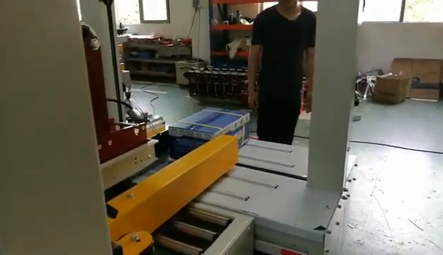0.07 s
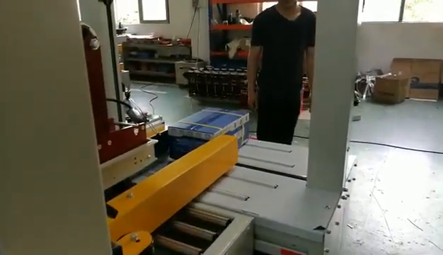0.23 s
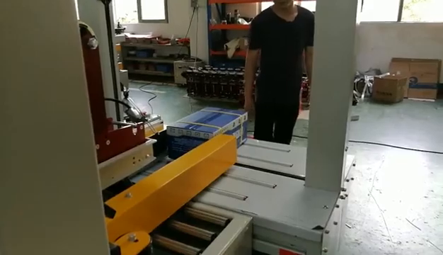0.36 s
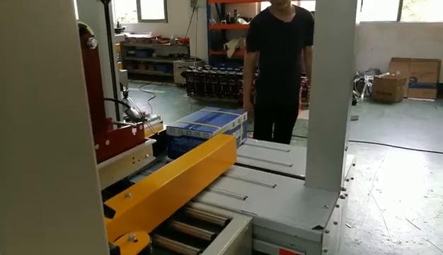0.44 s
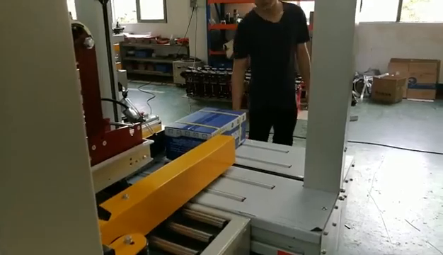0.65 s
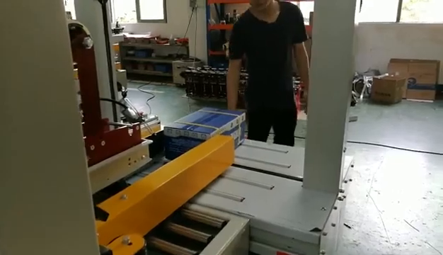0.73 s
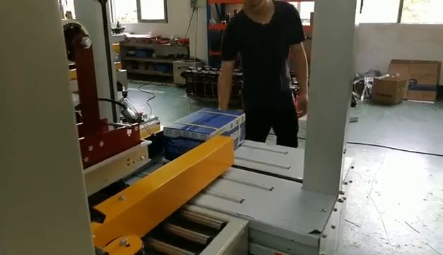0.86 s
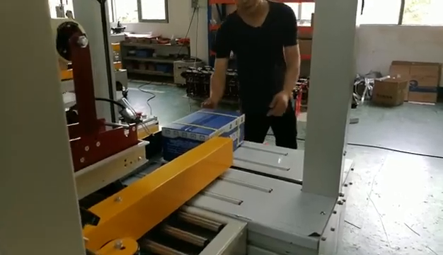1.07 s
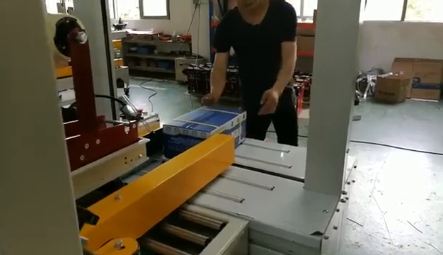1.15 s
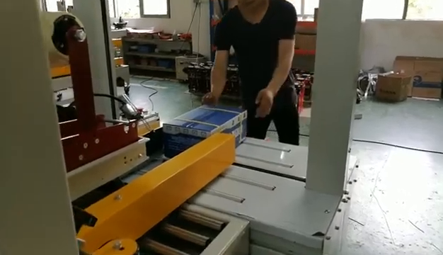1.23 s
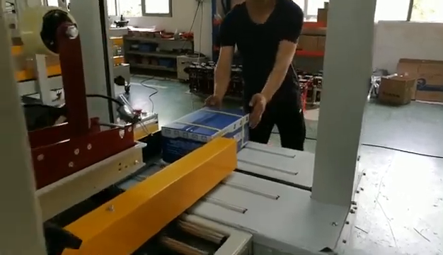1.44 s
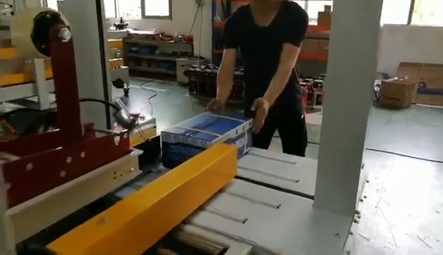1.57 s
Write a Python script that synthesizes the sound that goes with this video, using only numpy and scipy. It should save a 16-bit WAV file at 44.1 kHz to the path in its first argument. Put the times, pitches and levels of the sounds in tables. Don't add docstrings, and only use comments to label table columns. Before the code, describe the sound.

Packaging machine cycling: low bumps, loud metallic clack, hissing air, tape whir, snap, final thudding clatter

```python
import sys
import numpy as np
from scipy import signal
from scipy.fft import rfft, irfft
from scipy.io import wavfile
from scipy.ndimage import uniform_filter1d

SR = 44100
rng = np.random.default_rng(int(sys.argv[2]) if len(sys.argv) > 2 else 0)


def convert_level_to_amplitude(level_db):
    exponent = np.asarray(level_db, float) / 20
    return 10 ** exponent


def store_pcm(level_fs):
    pcm = np.round(np.clip(level_fs, -1, 1) * 32767).astype(np.int16)
    wavfile.write(sys.argv[1], SR, np.atleast_2d(pcm).T)


N = 70560

# (frequency [Hz], side minus mid [dB])
STEREO_SPREAD = [(60, -18.5), (150, -18.5), (230, -25.5), (360, -3.5), (570, -0.5), (890, -3), (1400, -4.5),
                 (2200, -1), (8460, -0.5)]
# (frequency [Hz], density [dB per Hz])
ARM_NOISE = [(88, -46), (150, -20), (325, -11), (514, -4), (1020, -10), (2400, -12), (4210, -16),
             (5000, -19.5), (7600, -23)]


def evened(x):
    return x / np.sqrt(np.mean(x ** 2) + 1e-20)


def read(points, hz):
    f, value = np.transpose(points)
    return np.interp(np.log(hz + 1), np.log(f + 1), value)


def curve(rows, axis=1):
    rows = np.array(rows)
    return np.interp(np.arange(N) / SR, rows[:, 0], rows[:, axis])


def resonate(x, hz, width):
    turn = np.exp(2j * np.pi * np.cumsum(hz * np.ones(N)) / SR)
    r = np.exp(-np.pi * width / SR)
    return 2 * (turn * signal.lfilter([1 - r], [1, -r], x / turn)).real


def pair(a, b, hz):
    side = convert_level_to_amplitude(read(STEREO_SPREAD, hz))[:, None]
    return np.array([a + side * b, a - side * b]) / np.sqrt(1 + side ** 2)


def hiss(spectrum, patchy_db=0.):
    frames, hz = N // 128 + 6, np.fft.rfftfreq(512, 1 / SR)
    a, b, c, d, patches = rng.standard_normal((frames, 257, 5)).T
    patches = uniform_filter1d(patches, size=5, axis=0)
    patches = evened(uniform_filter1d(patches, size=14, axis=1))
    gain = convert_level_to_amplitude(read(spectrum, hz)[:, None] + patchy_db * patches) * (hz[:, None] < 9500)
    z = pair(a + 1j * b, c + 1j * d, hz) * gain
    return evened(signal.istft(z, nperseg=512, noverlap=384)[1][:, :N])


def hall(x):
    # (frequency [Hz], t60 [s])
    hall_t60 = [(150, 2.25), (600, 2.33), (2000, 1.35), (4000, 1.58), (8000, 0.74)]
    taps = np.zeros((2, SR))
    at = np.arange(300, SR - 20, 20)
    at = at + rng.integers(0, 20, (2, len(at)))
    np.put_along_axis(taps, at, rng.choice([-1., 1.], at.shape), 1)
    hz, t, z = signal.stft(taps, SR, nperseg=512)
    decay = convert_level_to_amplitude(-60 * t / read(hall_t60, hz)[:, None])
    tail = signal.istft(pair(*z, hz) * decay, SR, nperseg=512)[1]
    return signal.fftconvolve(x.mean(axis=0)[None], tail / np.linalg.norm(tail[0]), axes=1)[:, :N]


def knocks(rows, rise_cycles, wet_db):
    t, out = np.arange(N) / SR, np.zeros((2, N))
    for s, db, hz, t60 in rows:
        u = np.maximum(t - s, 0)
        rise = np.sin(np.pi / 2 * np.minimum(u * hz / rise_cycles, 1))
        swell = convert_level_to_amplitude(db - 60 * u / t60) * rise
        mid = np.sin(2 * np.pi * hz * u)
        side = convert_level_to_amplitude(read(STEREO_SPREAD, hz) - 5) * np.cos(2 * np.pi * hz * u)
        out += swell * np.array([mid + side, mid - side])
    return out + convert_level_to_amplitude(wet_db) * hall(out)


def struck(blows, modes, crack, crack_db, crack_t60, wet_db, pan_db):
    t = np.arange(N) / SR
    force, after = np.zeros(N), np.zeros(N)
    for s, db, rise in blows:
        u = np.maximum(t - s, 0)
        force[round(s * SR)] = convert_level_to_amplitude(db)
        after += convert_level_to_amplitude(db + crack_db - 60 * u / crack_t60) * np.minimum(u / max(rise, 1e-4), 1)
    u, body = t[:SR // 2], 0
    for k, ((hz, db, t60), phase) in enumerate(zip(modes, rng.random(len(modes)))):
        phases = np.array([[k // 2 / 2], [phase]])
        levels = convert_level_to_amplitude([[0], [read(STEREO_SPREAD, hz) - 4]])
        mid, side = np.sin(2 * np.pi * (hz * u + phases)) * levels
        body = body + convert_level_to_amplitude(db - 60 * u / t60) * np.array([mid + side, mid - side])
    dry = signal.fftconvolve(force[None], body, axes=1)[:, :N] + after * hiss(crack)
    return dry * convert_level_to_amplitude([[pan_db / 2], [-pan_db / 2]]) + convert_level_to_amplitude(wet_db) * hall(dry)


def hum():
    # (frequency [Hz], density [dB per Hz])
    hall_colour = [(25, -29.5), (70, -14), (170, -6.5), (380, -6.5), (480, -6), (900, -16.5), (3200, -17),
                   (7600, -33)]
    level_db = -44.5
    hz = np.fft.rfftfreq(N, 1 / SR)
    white = rfft(hiss([(20, 0.003), (9000, 0.028)], patchy_db=-1.5))
    return convert_level_to_amplitude(level_db) * evened(irfft(white * convert_level_to_amplitude(read(hall_colour, hz)), N))


def drive():
    # (time [s], level [dB])
    load = [(0, -45), (.1, -48.5), (.22, -39.5), (.28, -41), (.33, -40.5), (.38, -44), (.52, -38),
            (.66, -46), (.85, -48), (1.25, -51.5), (1.6, -59)]
    # (frequency [Hz], width [Hz], level [dB])
    frame_modes = [(163.2, 35.5, 5), (206, 32, 7), (242.8, 18, -1), (326.6, 112, -3), (365.3, 22, 3),
                   (108, 13, -18), (760, 920, -6)]
    push = hiss([(50, 0.5), (2000, 0.0), (4000, -19.0)], patchy_db=1.0)
    body = 0
    for f, width, db in frame_modes:
        body = body + convert_level_to_amplitude(db) * np.array([resonate(resonate(p, f, width), f, width) for p in push])
    return convert_level_to_amplitude(curve(load)) * evened(body)


def motor():
    # (time [s], level [dB], pitch [Hz])
    speed = [(0, -73, 104.1), (.55, -62, 104.9), (.72, -58.5, 105), (1.0, -54.5, 102.8), (1.1, -57, 97.4),
             (1.25, -58, 105.4), (1.38, -60, 106), (1.6, -78, 107.4)]
    hz, width = curve(speed, axis=2), 18.0
    waver = evened(resonate(resonate(rng.standard_normal(N), hz, width), hz, width))
    tone = np.sin(2 * np.pi * np.cumsum(hz) / SR)
    return convert_level_to_amplitude(curve(speed)) * evened(tone + 1.7 * waver)


def clutch():
    # (time [s], level [dB], pitch [Hz], t60 [s])
    bumps = [(.097, -49, 241, 0.093), (.131, -34.5, 250, 0.13), (.19, -42, 177, 0.17),
             (.236, -34.5, 230, 0.14), (.25, -42.5, 364, 0.19), (.33, -38, 392.6, .15),
             (.36, -33, 185, 0.17), (.419, -32.5, 197, .25), (.425, -32.5, 349, 0.13),
             (.455, -31.5, 177.4, 0.31), (.497, -32, 165, 0.23), (.525, -33, 174, 0.18),
             (.55, -39, 357.6, 0.24), (.575, -42.5, 152, 0.18)]
    return knocks(bumps, rise_cycles=2.2, wet_db=-7.5)


def air():
    # (time [s], level [dB])
    flow = [(.215, -65), (.24, -37), (.3, -41), (.39, -43), (.5, -38), (.7, -44.5), (.95, -42.5),
            (1.08, -42.5), (1.12, -46), (1.25, -51), (1.6, -55.5)]
    # (frequency [Hz], density [dB per Hz])
    jet_colour = [(290, -34), (500, -21), (600, -10.5), (762, 2), (1260, -19), (2460, -1), (3390, 0),
                  (7600, -9.5), (9880, -34.5), (16700, -120)]
    return convert_level_to_amplitude(curve(flow)) * hiss([(200, -40)] + list(jet_colour), patchy_db=.7)


def valve():
    # (time [s], level [dB], rise [s])
    ticks = [
        (.2207, -32, .0004),
        (.2221, -36, .0005),
        (.226, -43, .001),
        (.2315, -37, .0015),
    ]
    # (frequency [Hz], level [dB], t60 [s])
    housing_modes = [(1475, -3, .05), (2250, -3, .01), (2750, -3, .012), (3200, -3, .025), (3887, -6, .012),
                     (8100, -6, .012)]
    # (frequency [Hz], density [dB per Hz])
    tick_noise = [(300, -6), (700, -2), (1260, 3), (2700, 10), (4400, 3), (5600, -8), (7000, -5), (8100, 2),
                  (8900, -25)]
    return struck(ticks, housing_modes, tick_noise, crack_db=2.5, crack_t60=.016, wet_db=-7, pan_db=1.1)


def snaps():
    # (time [s], level [dB], pitch [Hz], t60 [s])
    parts = [(.2209, -21, 2500, .009), (.2214, -29, 4200, .008), (.2235, -29, 1150, .018),
             (.2225, -30, 8000, .008), (.2338, -30, 7600, .005), (.2325, -32, 3200, .012),
             (.4013, -13.5, 1650, .014), (.4018, -17, 3700, .018), (.4008, -27, 7800, .04),
             (.4067, -14.5, 4000, .014), (.4142, -18, 2900, .008), (.4208, -21, 2300, .01),
             (.4262, -22, 2200, .012), (.99, -29, 3600, .015), (1.0015, -32, 1000, .015),
             (1.3, -33, 1050, .05), (1.318, -32, 1080, .03), (1.343, -34, 1700, .03),
             (1.354, -36, 2400, .03)]
    return knocks(parts, rise_cycles=1.6, wet_db=-9)


def latch():
    # (time [s], level [dB], rise [s])
    clacks = [(.4009, -27, .0003), (.4019, -28, .0003), (.4045, -30, .001), (.407, -27, .0005),
              (.4105, -30, .001), (.4145, -29, .002), (.421, -30, .002), (.427, -30, .002),
              (.515, -40, .01)]
    # (frequency [Hz], level [dB], t60 [s])
    steel_modes = [(1510, -4, .015), (1650, -3, .035), (2225, -9, .2), (2649, -13, .06), (3140, -10, .05),
                   (3310, -8, .035), (3560, -7, .05), (3990, -9, .04), (4440, -9, .03), (4673, -13, .08),
                   (6045, -13, .07), (8100, -4, .015)]
    # (frequency [Hz], density [dB per Hz])
    clack_noise = [(300, -17), (600, -5), (1100, -7.5), (1600, -8.5), (2600, -3), (3700, -5), (4600, -7),
                   (6700, -10), (8600, -16)]
    return struck(clacks, steel_modes, clack_noise, crack_db=-3.0, crack_t60=0.059, wet_db=-1.5, pan_db=-2.7)


def tape():
    # (time [s], level [dB], pitch [Hz])
    peel = [(.49, -62, 3100), (.52, -41, 3100), (.56, -46, 2980), (.68, -45, 2950), (.85, -45, 2920),
            (.92, -43, 2900), (.98, -44, 2900), (1.04, -49, 2900), (1.095, -48, 2900)]
    slips_per_s, width_hz, spread_db, hiss_share = 800, 290, 1.9, .7
    draw = rng.random((N, 4)).T
    size = convert_level_to_amplitude(spread_db * np.minimum(-np.log(draw[1] + 1e-9), 4)) * np.sign(draw[2] - .5)
    slips = evened(size * (draw[0] < slips_per_s / SR))
    hz = curve(peel, axis=2)
    ring = []
    for noise in rng.standard_normal((2, N)):
        strip = resonate(slips + hiss_share * noise, hz, width_hz)
        ring.append(evened(resonate(strip, hz, 2 * width_hz)))
    n = np.arange(N)
    peeling = (n > peel[0][0] * SR) & (n < peel[-1][0] * SR)
    return peeling * convert_level_to_amplitude(curve(peel)) * np.array(ring) * convert_level_to_amplitude([[1.], [-1.]])


def cutter():
    # (time [s], level [dB], rise [s])
    cuts = [
        (.979, -44, .004),
        (.9835, -39, .003),
        (.99, -38, .002),
        (.998, -42, .003),
        (1.008, -42, .004),
        (1.019, -47, .004),
    ]
    # (frequency [Hz], level [dB], t60 [s])
    holder_modes = [(733, -2, 0.03), (870, -3, 0.023), (1460, -10, 0.03), (3100, -4, 0.019),
                    (3720, 0, 0.02), (6020, -3, 0.02), (4900, -5, .02)]
    # (frequency [Hz], density [dB per Hz])
    cut_noise = [(180, -35.5), (300, -21), (694, -3.5), (773, -2.5), (885, -7.5), (1010, -9.5), (7600, -11),
                 (9880, -57), (16700, -120)]
    return struck(cuts, holder_modes, cut_noise, crack_db=4.5, crack_t60=0.098, wet_db=-7.0, pan_db=1.5)


def scuff():
    # (time [s], level [dB], rise [s])
    scrapes = [
        (1.27, -49, .008),
        (1.284, -48, .008),
    ]
    # (frequency [Hz], level [dB], t60 [s])
    carton_modes = [(800, 4, .03), (1010, 7.9, 0.095)]
    return struck(scrapes, carton_modes, ARM_NOISE, crack_db=14.5, crack_t60=0.066, wet_db=-14, pan_db=-2.5)


def arm():
    # (time [s], level [dB], rise [s])
    landings = [
        (1.303, -32, .005),
        (1.309, -32, 0.006),
        (1.32, -36.5, 0.012),
        (1.335, -42, 0.0019),
        (1.356, -37.5, 0.0045),
        (1.364, -44.5, 0.0031),
        (1.379, -50, .004),
    ]
    # (frequency [Hz], level [dB], t60 [s])
    bar_modes = [(145.6, -6.5, 0.18), (202.7, -3, 0.25), (228, -8, 0.069), (299, -8.5, 0.062),
                 (398, -5, 0.11), (777, -10, 0.056), (1066, -10.5, 0.052), (1485, -9.5, 0.066),
                 (2360, -12, 0.027), (4180, -7, 0.031)]
    return struck(landings, bar_modes, ARM_NOISE, crack_db=-1.0, crack_t60=0.14, wet_db=-2.5, pan_db=0.9)


def thumps():
    # (time [s], level [dB], pitch [Hz], t60 [s])
    bounces = [(1.301, -28, 290, .06), (1.308, -27, 320, .06), (1.317, -28, 280, .05),
               (1.333, -35, 240, .06), (1.353, -31, 280, .05), (1.362, -31, 270, .05),
               (1.377, -34, 310, .05)]
    return knocks(bounces, rise_cycles=1.6, wet_db=-9)


def scene():
    steady = hum() + drive() + motor()
    opening = clutch() + air() + valve() + snaps() + latch()
    sealing = tape() + cutter() + scuff() + arm() + thumps()
    return steady + opening + sealing


def floor_dip(x):
    dip_hz, width_hz, share = 493, 150, 0.6
    return x - share * np.array([resonate(v, dip_hz, width_hz) for v in x])


def patchy_bands(x):
    # (frequency [Hz], share [0-1])
    side_kept = [(60, .12), (200, .15), (260, .35), (320, .75), (400, 1)]
    gap_share, deepest_db = .15, -26
    loud_over = 2.5
    mid, side = (x[0] + x[1]) / 2, (x[0] - x[1]) / 2
    hz, t, z = signal.stft(mid, SR, nperseg=1024, noverlap=768)
    frame = np.arange(len(t))
    band = (np.log(hz + 900) * 32).astype(int)
    bands = band.max() + 1
    gaps = np.maximum(1 - rng.random((len(t) // 5 + 3, bands)).T / gap_share, 0)
    shift = rng.integers(0, 8, bands)[band]
    gaps = gaps[band[:, None], (frame + shift[:, None]) // 5] * (hz[:, None] > 400)
    power = (abs(z[hz > 800]) ** 2).sum(axis=0)
    gaps = gaps * (power < loud_over * np.median(power))
    mid = signal.istft(z * convert_level_to_amplitude(deepest_db * gaps), SR, nperseg=1024, noverlap=768)[1][:N]
    chance = rng.random((len(t) // 8 + 2, 5)).T[np.minimum(hz // 90, 4).astype(int)]
    kept = chance[:, frame // 8] < read(side_kept, hz)[:, None]
    z_side = signal.stft(side, SR, nperseg=1024, noverlap=768)[2]
    side = signal.istft(z_side * kept, SR, nperseg=1024, noverlap=768)[1][:N]
    return np.array([mid + side, mid - side])


def band_limit(x, edge_hz):
    taps = signal.firwin(601, edge_hz, window=("kaiser", 9), fs=SR)
    return signal.oaconvolve(x, taps[None], "same")


def roll_off(x):
    return signal.sosfilt(signal.butter(12, 9060, fs=SR, output="sos"), x)


def record(dry):
    # (from [s], to [s], level [dB])
    wide_open = [
        (.214, .238, 0),
        (.399, .4075, 0),
        (.238, .258, -20),
        (.365, .399, -9),
    ]
    thin = patchy_bands(floor_dip(dry))
    low, wide = band_limit(thin, 7540), band_limit(thin, 8600)
    t = np.arange(N) / SR
    gate = sum(convert_level_to_amplitude(db) * ((t > a) & (t < b)) for a, b, db in wide_open)
    gate = uniform_filter1d(gate, size=90)
    mix = low + gate * convert_level_to_amplitude([[3], [-4]]) * (wide - low)
    return roll_off(mix)


dry = scene()
out = record(dry)
store_pcm(out)
```